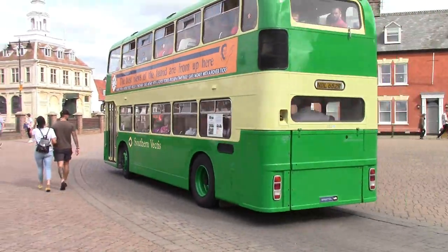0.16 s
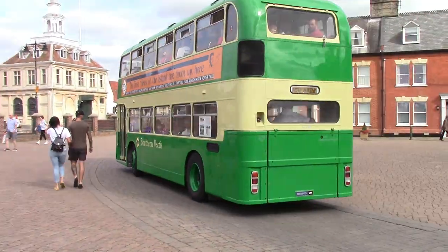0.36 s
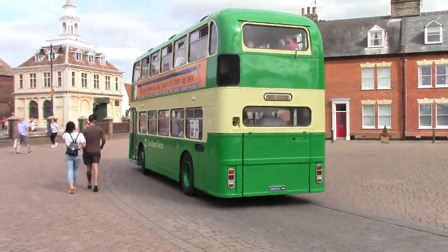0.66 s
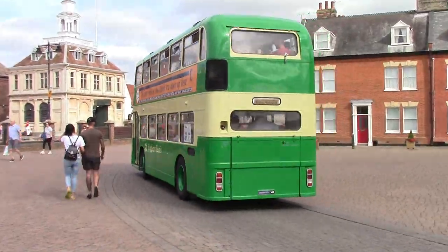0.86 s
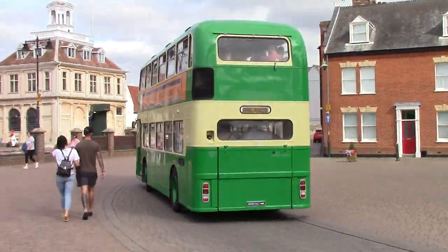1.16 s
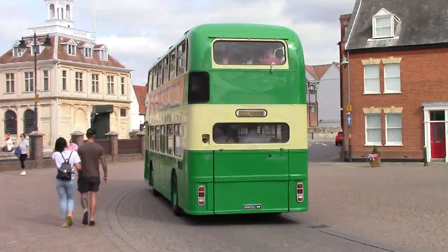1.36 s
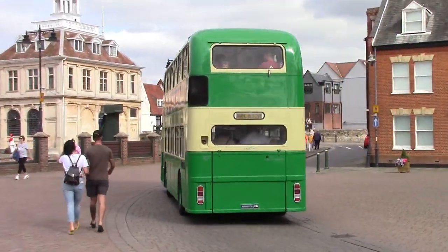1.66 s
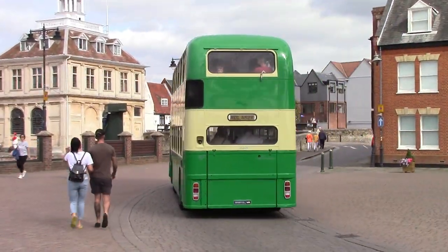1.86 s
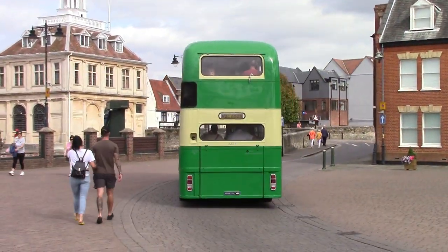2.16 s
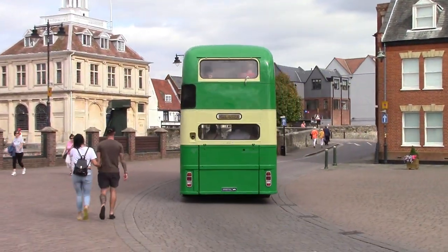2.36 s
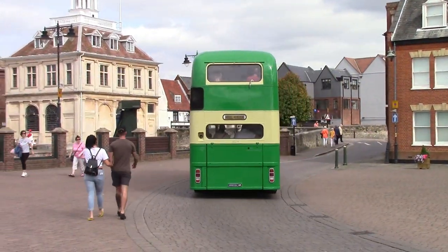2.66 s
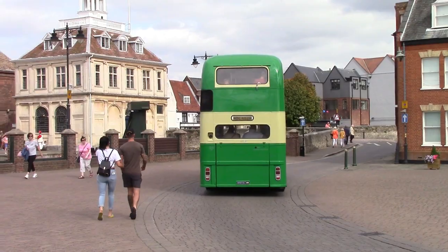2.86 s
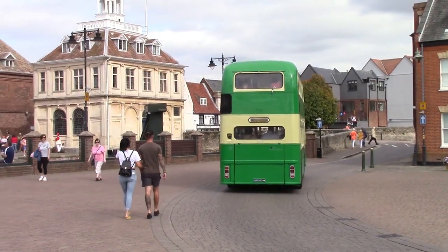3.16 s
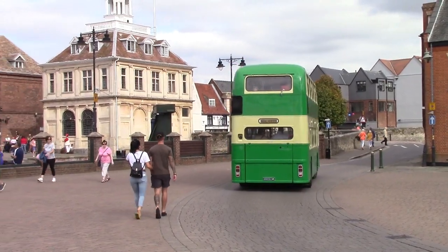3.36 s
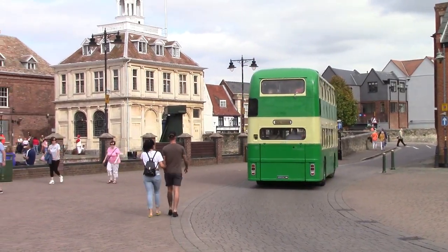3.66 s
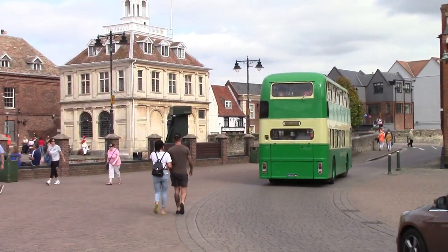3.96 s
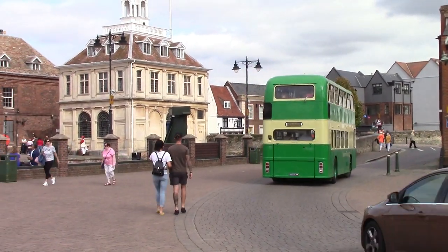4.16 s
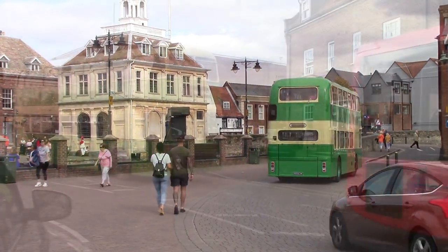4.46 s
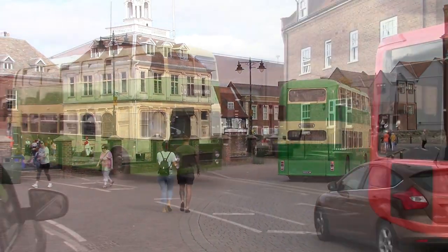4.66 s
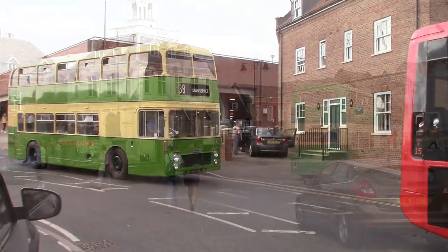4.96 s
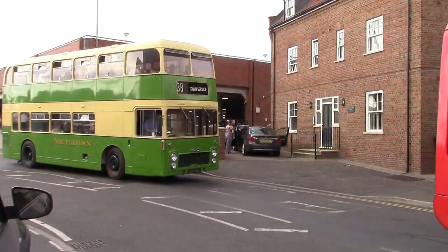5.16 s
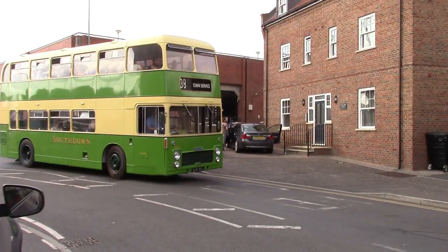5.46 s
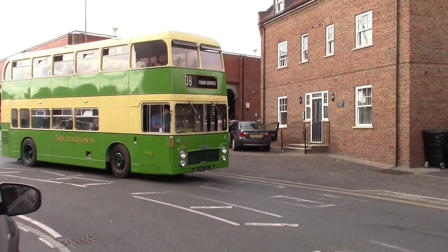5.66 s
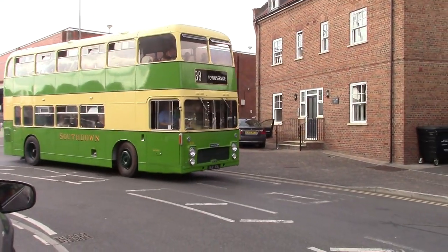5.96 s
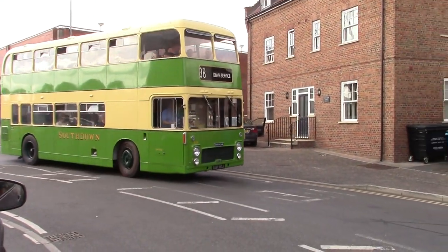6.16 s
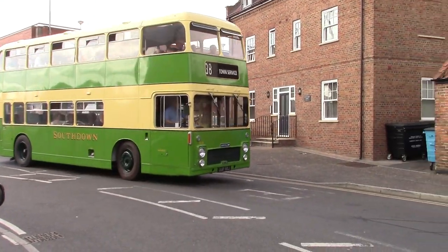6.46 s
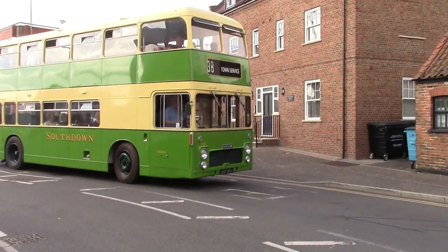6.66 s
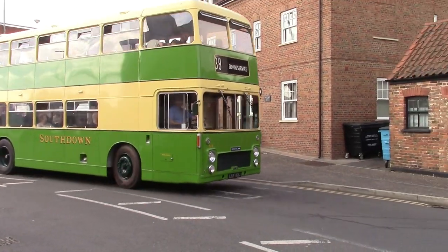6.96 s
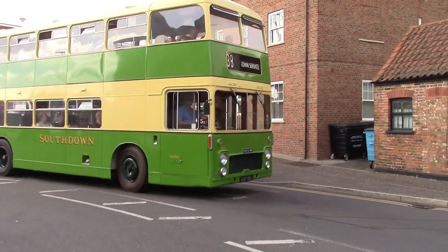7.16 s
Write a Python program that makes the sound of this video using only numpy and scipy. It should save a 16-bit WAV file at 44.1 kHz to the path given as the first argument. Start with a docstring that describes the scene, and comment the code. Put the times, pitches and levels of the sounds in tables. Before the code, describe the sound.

Outdoors in an open paved square, a double-decker's rough diesel roar starts loud and quickly sinks to a thin distant rumble. Small air puffs follow, then one sharp air-brake blast with trailing hiss, and wind snapping in lumps on the microphone. The scene crossfades to a street where two diesels roar close and steadily, with a brief sliding whine, hum and ticking as one bus draws level.

```python
"""A windy town square, then a street. A diesel bus: knocks shaped into a roar that sinks into rumble, puffs and
one brake-air blast of coloured noise, and gusts snapping in lumps on the microphone. The square dissolves into
the street: one diesel runs close by while a second gathers speed and draws level. Uneven firings drive their
roar, block resonances and injector ticks; low multiples of the rates hum."""
import sys
import numpy as np
from scipy import signal
from scipy.fft import rfft, irfft, next_fast_len
from scipy.io import wavfile

SR = 44100
rng = np.random.default_rng(int(sys.argv[2]) if len(sys.argv) > 2 else 0)


def pcm_store(signal):
    """Save signal as 16-bit PCM."""
    levels = np.round(np.clip(np.atleast_2d(signal), -1, 1) * 32767)
    wavfile.write(sys.argv[1], SR, levels.astype(np.int16).T)


def invert_db(x):
    """Field ratio 10**(x/20) for x, a level in decibels (scalar or array-like)."""
    u = np.asarray(x, float) / 20
    return 10 ** u


N = 323253
DISSOLVE_FROM_S, DISSOLVE_S = 4.26, 0.99


def rms_one(x):
    """Scales to rms 1."""
    return x / np.sqrt(np.mean(x ** 2) + 1e-20)


def in_time(rows):
    """Columns of a curve at every sample, and a gate that is open while the curve lasts."""
    s, *columns = np.transpose(rows)
    t = np.arange(N) / SR
    gate = np.interp(t, [s[0] - .02, s[0], s[-1], s[-1] + .02], [0, 1, 1, 0])
    return [np.interp(t, s, column) for column in columns] + [gate]


def colour(x, spectrum):
    """Shapes a signal by a gain curve over log frequency; rms 1."""
    size = next_fast_len(N)
    hz, db = np.transpose(spectrum)
    bin_hz = np.arange(size // 2 + 1) * SR / size
    gain = invert_db(np.interp(np.log(bin_hz + 1), np.log(hz), db))
    return rms_one(irfft(rfft(x, size) * gain, size)[:N])


def hiss(spectrum):
    """Steady coloured noise; rms 1."""
    return colour(rng.standard_normal(N), spectrum)


def drift(corner_hz):
    """Slow chance of spread 1: noise through two equal one-pole low-passes at SR / 40."""
    r = np.exp(-80 * np.pi * corner_hz / SR)
    noise = rng.standard_normal(N // 40 + 2002)
    slow = signal.lfilter([1], [1, -2 * r, r * r], noise)[2000:]
    return np.interp(np.arange(N) / 40, np.arange(len(slow)), rms_one(slow))


def resonance(x, hz, width_hz):
    """Two-pole resonator: rings at one frequency."""
    r = np.exp(-np.pi * width_hz / SR)
    poles = [1, -2 * r * np.cos(2 * np.pi * hz / SR), r * r]
    return signal.lfilter([(1 - r * r) / 2, 0, (r * r - 1) / 2], poles, x)


def swell(start_s, hold_s, db, rise_db_per_s, fall_db_per_s):
    """Envelope that rises to a level, holds and falls, straight in dB."""
    late_s = np.arange(N) / SR - start_s
    rise_db = rise_db_per_s * np.minimum(late_s, 0)
    fall_db = fall_db_per_s * np.maximum(late_s - hold_s, 0)
    return invert_db(db + rise_db - fall_db)


def bursts(rows, rise):
    """Envelope of short bell-shaped swells, rising over a share of the length."""
    t, out = np.arange(N) / SR, np.zeros(N)
    for s, db, length_s in rows:
        near = slice(int((s - .1) * SR), int((s + .15) * SR))
        late = (t[near] - s) / max(length_s, 1e-3)
        out[near] += invert_db(db) * np.exp(-np.where(late < 0, late / rise, late) ** 2)
    return out


# faint bass left under the low cut: (frequency [Hz], density [dB per Hz])
BASS_FLOOR_SPECTRUM = [(12, -58), (20, -32), (101, -23.5), (259, -23), (543, -3), (600, -1), (780, -32),
                       (1320, -120)]


def bass_floor():
    """Steady faint bass noise, independent in the two channels."""
    return invert_db(-66) * np.array([hiss(BASS_FLOOR_SPECTRUM), hiss(BASS_FLOOR_SPECTRUM)])


# low cut over the whole square: (time [s], edge [octaves above 100 Hz])
LOW_CUT_EDGE = [(0, 0), (.22, 1.4), (.3, 1.57), (.5, 2.15), (.8, 2.0), (1.15, 2.5), (1.3, 1.5),
                (1.75, 1.54), (1.9, 2.5), (2.83, 2.5), (3.1, 2.4), (3.4, 3), (3.83, 3), (4.4, 2.5)]


def sliding_low_cut(x):
    """Steep high-pass whose edge slides, stepped in short blocks; a little of the input leaks past."""
    leak_db, block = -42.5, 512
    octaves, _ = in_time(LOW_CUT_EDGE)
    out, state = np.zeros(x.shape), np.zeros((2, len(x), 2))
    for i in range(0, int((DISSOLVE_FROM_S + DISSOLVE_S) * SR), block):
        edge_hz = 100 * 2 ** np.clip(octaves[i], -1, 4)
        sos = signal.butter(4, edge_hz, "high", fs=SR, output="sos")
        out[:, i:i + block], state = signal.sosfilt(sos, x[:, i:i + block], zi=state)
    return out + invert_db(leak_db) * x


# small puffs of air before the low cut: (time [s], level [dB], length [s])
PUFFS = [(1.01, -41, 0.03), (1.13, -44, 0.01), (1.315, -41, .012), (1.54, -40.5, 0.02), (1.77, -47, 0.022),
         (2.025, -48, 0.011), (2.165, -44.5, 0.037), (2.325, -47, 0.025), (2.445, -45, 0.0091),
         (2.53, -47, 0.066), (2.655, -47, 0.034)]


def puff_envelope():
    """Each puff is a short swell of moving air."""
    return bursts(PUFFS, rise=0.72)


# town before the low cut: (time [s], rumble level [dB], treble hiss level [dB])
TOWN_LEVELS = [(0.6, -37, -51), (0.82, -34, -43), (1.36, -32.5, -43), (1.8, -34.5, -43.5),
               (2.55, -34, -48.5), (3.09, -34.5, -42.5), (3.4, -37.5, -38), (3.8, -39, -48),
               (4.3, -38.5, -48), (5.3, -41, -48)]
# town rumble: (frequency [Hz], density [dB per Hz])
TOWN_RUMBLE_SPECTRUM = [(59, -78), (100, -53), (258, -27), (668, -15), (761, -5), (942, -10.5),
                        (1090, -1.5), (1180, -6.5), (1240, 1), (1350, -5), (1840, -1), (3010, -11),
                        (5000, -30), (6500, -67), (11000, -120)]
# town treble and puffs: (frequency [Hz], density [dB per Hz])
TOWN_HISS_SPECTRUM = [(2060, -10.5), (3500, 0), (3700, -4), (5050, -2), (9710, -7), (14400, -28),
                      (15500, -32)]


def town():
    """Mid and side: wavering noise rumble, and a wide hiss that the puffs swell."""
    side_db = -10
    rumble_db, hiss_db, on = in_time(TOWN_LEVELS)
    rumble = on * invert_db(rumble_db + 1.67 * drift(1.73)) * hiss(TOWN_RUMBLE_SPECTRUM)
    treble = on * invert_db(hiss_db + 0.47 * drift(3.1) + 1.5 * drift(24)) + puff_envelope()
    mid = rumble + treble * hiss(TOWN_HISS_SPECTRUM)
    side = invert_db(side_db) * treble * hiss(TOWN_HISS_SPECTRUM)
    return np.array([mid, side])


# blast stages, sounding together: (hold [s], level [dB], fall [dB per s])
BLAST_STAGES = [(.075, -19.5, 142), (.2, -43, 70)]
# after-hiss stages, sounding together: (hold [s], level [dB], fall [dB per s])
AFTER_STAGES = [(.004, -34, 400), (.11, -33, 120), (.5, -38.5, 45)]
# blast: (frequency [Hz], density [dB per Hz])
BLAST_SPECTRUM = [(290, -58), (500, -33), (716, -11), (827, -17), (1090, -5), (1370, -8), (1930, 0.5),
                  (3330, -6.5), (4010, -10.5), (9780, -6), (15500, -27)]
# after-hiss: (frequency [Hz], density [dB per Hz])
AFTER_SPECTRUM = [(2350, -44), (4000, -3), (4190, -24), (4710, -12), (7500, 2), (9300, -2), (15500, -20)]
# blast off the walls, in the side: (frequency [Hz], density [dB per Hz])
AIR_SIDE_SPECTRUM = [(1000, -50), (3000, -24), (5000, -6), (8000, -1), (12000, -5), (15500, -14)]


def venting(stages):
    """Envelope of air from the opening valve: stages that start together and die at their own rates."""
    valve_s, rise_db_per_s = 3.05, 3000
    return sum(swell(valve_s, hold_s, db, rise_db_per_s, fall) for hold_s, db, fall in stages)


def brake_air():
    """Mid and side: turbulent noise vents in a blast and a longer, wider after-hiss."""
    blast_side_db, after_side_db = -23, -4.5
    blast, after = venting(BLAST_STAGES), venting(AFTER_STAGES)
    mid = blast * hiss(BLAST_SPECTRUM) + after * hiss(AFTER_SPECTRUM)
    side = (invert_db(blast_side_db) * blast + invert_db(after_side_db) * after) * hiss(AIR_SIDE_SPECTRUM)
    return np.array([mid, side])


# gusts on the microphone before the low cut: (time [s], hold [s], level [dB])
GUSTS = [(1.257, .04, -40), (1.34, 0.15, -28), (1.58, 0.12, -39), (2.857, .12, -37.5), (3.067, .13, -42),
         (3.26, .19, -29), (3.472, .13, -26.5), (3.62, 0.12, -26), (3.765, .068, -30), (4.027, 0.038, -30),
         (4.093, 0.062, -38.5)]
# hardest buffets before the low cut: (time [s], level [dB], length [s])
BUFFETS = [(1.27, -25, .004), (1.335, -23, .005), (1.357, -28, 0.0045), (1.368, -20, 0.0051),
           (1.381, -20, 0.0032), (1.417, -18, 0.0046), (1.46, -28, .006), (1.483, -21, .003),
           (1.72, -23, .004), (2.915, -26, 0.0044), (2.943, -27, 0.0031), (3.443, -23, .003),
           (3.474, -24, .0015), (3.495, -17.5, 0.0035), (3.539, -21, .004), (3.659, -20, 0.011),
           (3.682, -22, .007), (3.701, -9, 0.0018), (3.709, -19, .006), (3.73, -8, 0.0018),
           (3.776, -20, 0.0056), (3.786, -16, 0.0034), (3.8, -11.5, .002), (3.809, -22, 0.0085),
           (4.038, -19, 0.0042)]
# snaps: (frequency [Hz], density [dB per Hz])
GUST_SPECTRUM = [(100, -5.5), (300, -5), (600, -11), (1200, -14.5), (2500, -22), (4000, -38.5), (8000, -64),
                 (15000, -75)]


def gusts():
    """Mid and side: eddies snap at the ports, a few thousand a second, in lumps."""
    lumpy_db, spread_db, snaps_per_s, side_db = 2.6, 1.6, 2500, -12
    blowing = sum(swell(s, hold_s, db, rise_db_per_s=500, fall_db_per_s=600) for s, hold_s, db in GUSTS)
    lumps = blowing * rms_one(invert_db(lumpy_db * drift(60))) + bursts(BUFFETS, rise=.35)
    happens = rng.random((2, N)) < snaps_per_s / SR
    strength = invert_db(spread_db * np.minimum(rng.exponential(1, (2, N)), 4))
    snaps = happens * strength * rng.choice([-1, 1], (2, N))
    mid, side = lumps * np.array([colour(s, GUST_SPECTRUM) for s in snaps])
    # long waves reach both ports alike
    side = signal.sosfilt(signal.butter(3, 800, "high", fs=SR, output="sos"), side)
    return np.array([mid, invert_db(side_db) * side])


def firings(per_s, uneven_db):
    """One click per firing, of random strength."""
    clicks = np.diff(np.floor(np.cumsum(per_s) / SR), prepend=0)
    return clicks * invert_db(uneven_db * rng.standard_normal(N))


def dying(clicks, decay_s):
    """Envelope that jumps at each click and dies; rms 1."""
    return rms_one(signal.lfilter([1], [1, -np.exp(-1 / (decay_s * SR))], clicks + 1e-18))


def combustion(clicks, decay_s, gate, alike_db):
    """Firings swell fresh noise and repeat one same knock: faint lines on every multiple of the rate."""
    knock = rng.standard_normal(4096) * np.exp(-np.arange(4096) / (2 * decay_s * SR))
    fresh = (1 + gate * dying(clicks, decay_s)) * rng.standard_normal(N)
    alike = rms_one(signal.fftconvolve(clicks, knock)[:N])
    return fresh + invert_db(alike_db) * alike


# engine block resonances: (frequency [Hz], width [Hz], level [dB])
BLOCK_RESONANCES = [(473, 150, -34.5), (816, 38, -5.5), (1176, 120, -8), (1330, 35, -3.5),
                    (2300, 600, -8.5)]


def engine_block(knocks, waver_db):
    """Knocks ring the casting; each resonance swells on its own; rms 1."""
    ringing = 0
    for hz, width_hz, db in BLOCK_RESONANCES:
        level = invert_db(db + waver_db * drift(4.8))
        ringing = ringing + level * rms_one(resonance(knocks, hz, width_hz))
    return rms_one(ringing)


# fading bus before the low cut: (time [s], roar level [dB])
FADING_ROAR_LEVEL = [(0, -10.5), (.25, -17.5), (.31, -21.5), (.5, -20.5), (.72, -27), (.82, -35.5),
                     (1.0, -29.5), (1.4, -31.5), (1.75, -35), (1.9, -58)]
# fading bus before the low cut: (time [s], treble level [dB])
FADING_TREBLE_LEVEL = [(0.0, -24.5), (0.228, -27.5), (0.264, -33.5), (0.564, -35), (0.85, -46)]
# fading bus roar: (frequency [Hz], density [dB per Hz])
FADING_ROAR_SPECTRUM = [(35, -70), (60, -40), (86, -15), (209, -4.5), (430, -5), (554, -0.5), (606, -3.5),
                        (824, -0.5), (902, -4), (1040, -0.5), (2000, -9), (2180, -14), (4500, -44),
                        (5850, -57), (9900, -120)]
# fading bus treble: (frequency [Hz], density [dB per Hz])
FADING_TREBLE_SPECTRUM = [(2060, -26), (3500, 2), (4380, -9.5), (5760, 1), (8360, -2.5), (13000, -12),
                          (15500, -22)]


def fading_bus():
    """Firings knock through the block; the roar and treble sink."""
    firing_per_s, block_db = 42.0, -8.0
    roar_db, on = in_time(FADING_ROAR_LEVEL)
    treble_db, treble_on = in_time(FADING_TREBLE_LEVEL)
    fired = firings(np.full(N, firing_per_s), uneven_db=3.5)
    knocks = combustion(fired, decay_s=0.009, gate=0.13, alike_db=-5.5)
    roar = colour(knocks, FADING_ROAR_SPECTRUM) + invert_db(block_db) * engine_block(knocks, waver_db=4.5)
    treble = treble_on * invert_db(treble_db) * hiss(FADING_TREBLE_SPECTRUM)
    return on * invert_db(roar_db + 0.17 * drift(7.7)) * roar + treble


# patchy band in the street hiss: (time [s], centre [Hz], level [dB])
HISS_BAND = [(4.2, 4860, -36), (5.3, 5010, -33), (5.9, 5120, -28), (6.4, 4850, -30.5), (7.33, 4530, -42)]


def hiss_band():
    """Noise several hundred Hz wide riding on a drifting centre, swelling in patches."""
    hz, db, _ = in_time(HISS_BAND)
    turn = 2 * np.pi * np.cumsum(hz) / SR
    low_pass = signal.butter(2, 450, fs=SR, output="sos")
    a, b = signal.sosfilt(low_pass, rng.standard_normal((2, N)))
    return invert_db(db + 3.4 * drift(2.8)) * rms_one(a * np.cos(turn) + b * np.sin(turn))


# breathy whine sliding down as one bus passes: (time [s], pitch [Hz], level [dB], octave level [dB])
WHINE = [(4.7, 1330, -43, -58), (5.0, 1270, -33, -45), (5.2, 1199, -22.5, -22), (5.35, 1160, -19, -30),
         (5.55, 1132, -33, -34), (5.8, 1094, -23, -38), (5.95, 1093, -54.5, -60)]


def whine():
    """Narrow noise bands riding on the sliding pitch and its octave."""
    hz, db, octave_db, on = in_time(WHINE)
    turn = 2 * np.pi * np.cumsum(hz) / SR

    def band(k):
        return drift(35) * np.cos(k * turn) + drift(37.0) * np.sin(k * turn)

    return on * (invert_db(db) * band(1) + invert_db(octave_db) * band(2))


def order(per_s, multiple, waver_db):
    """Near-sine on a multiple of the firing rate; level wavers, and phase with the crank's uneven turning."""
    level = np.sqrt(2) * invert_db(waver_db * (drift(6.2) + drift(22)))
    turn = 2 * np.pi * multiple * np.cumsum(per_s) / SR
    return level * np.sin(turn + 0.12 * multiple * drift(10.5) + 6 * rng.random())


def tones(per_s, multiples, rows, waver_db):
    """Orders of one engine, each at rest level plus a spell in which it stands out."""
    hum = 0
    for multiple, (rest_db, s, hold_s, db) in zip(multiples, rows):
        spell = swell(s, hold_s, db, rise_db_per_s=60, fall_db_per_s=38)
        hum = hum + (invert_db(rest_db) + spell) * order(per_s, multiple, waver_db)
    return hum


# orders that hum in the near diesel: [multiples of the firing rate]
NEAR_ORDERS = (1, 2, 7, 8, 9, 10)
# one row an order: (resting level [dB], spell start [s], hold [s], level added in the spell [dB])
NEAR_TONES = [(-65, 6.3, 0.44, -62), (-50.5, 6.68, 0.49, -46.5), (-41.5, 5.86, 0.87, -22),
              (-40, 5.55, 2, -30), (-39, 6.15, .55, -27), (-39, 4.7, 0.27, -28)]


def near_hum(per_s):
    """The near diesel's orders follow its firing rate."""
    return tones(per_s, NEAR_ORDERS, NEAR_TONES, waver_db=1.7)


# orders that hum in the speeding diesel: [multiples of the firing rate]
SPEEDING_ORDERS = (2, 4, 5, 9)
# one row an order: (resting level [dB], spell start [s], hold [s], level added in the spell [dB])
SPEEDING_TONES = [(-66, 6.9, 0.25, -57), (-50.5, 6.0, .75, -41), (-45.5, 6.5, 0.38, -41),
                  (-46, 6.8, 0.52, -24)]


def speeding_hum(per_s):
    """The speeding diesel's orders follow its firing rate."""
    return tones(per_s, SPEEDING_ORDERS, SPEEDING_TONES, waver_db=1.4)


def injector_ticks(fired, nearness_db):
    """Each firing sets off a noise tick, rung in two treble bands; louder as the diesel nears."""
    tick = dying(fired, decay_s=.0038) * rng.standard_normal(N)

    def ring(hz, width_hz=3000):  # width of each of two passes
        return rms_one(resonance(resonance(tick, hz, width_hz), hz, width_hz))

    return invert_db(-35 + nearness_db) * ring(8600) + invert_db(-47 + .3 * nearness_db) * ring(11500)


# street treble: (frequency [Hz], density [dB per Hz])
STREET_TREBLE_SPECTRUM = [(1880, -25), (3200, -0.5), (4310, -4), (5250, -2), (6310, -4.5), (8780, -9.5),
                          (12500, -22), (15500, -26)]


def street_treble(near_fired):
    """Coloured noise that pulses with the near diesel's firings; rms 1."""
    pulse = 1 + 0.39 * dying(near_fired, decay_s=0.008)
    return colour(pulse * rng.standard_normal(N), STREET_TREBLE_SPECTRUM)


# street roar: (frequency [Hz], density [dB per Hz])
STREET_ROAR_SPECTRUM = [(24, -69), (40, -90), (92, -91), (129, -21.5), (290, -11), (408, -3.5), (452, -4),
                        (500, -5.5), (542, -4), (719, -2.5), (1010, -1), (1580, -5), (2470, -4),
                        (3210, -15.5), (5000, -24), (6500, -79), (11000, -120)]


def street_roar(near_fired, speeding_fired, nearness_db):
    """Both diesels' knocks, coloured, and ringing the block more strongly as the second one nears."""
    knocks = combustion(near_fired, decay_s=0.0057, gate=0.15, alike_db=-5)
    knocks += invert_db(-4) * combustion(speeding_fired, decay_s=0.012, gate=0.3, alike_db=-5.5)
    block = invert_db(-9 + 0.23 * nearness_db) * engine_block(knocks, waver_db=5.0)
    return colour(knocks, STREET_ROAR_SPECTRUM) + block


# street: (time [s], roar level [dB], treble level [dB])
STREET_LEVELS = [(4.2, -13.5, -21), (5.4, -13.5, -24.5), (5.82, -13.5, -24), (6.61, -13.5, -26.5),
                 (7.33, -14.5, -29.5)]
# near diesel: (time [s], firing rate [firings per s])
NEAR_FIRING = [(4.3, 59.5), (4.6, 63.1), (4.8, 65.3), (5.0, 65.1), (5.25, 61.8), (5.5, 61), (5.8, 63.3),
               (6.0, 63.8), (6.4, 66.5), (6.8, 68), (7.33, 67)]
# diesel gathering speed: (time [s], firing rate [firings per s])
SPEEDING_FIRING = [(4.5, 43.1), (5.0, 42.2), (5.8, 40), (6.0, 40.7), (6.4, 44.8), (6.8, 48.9), (7.0, 50.3),
                   (7.33, 52)]
# the diesel gathering speed draws level: (time [s], nearness [dB])
NEARNESS = [(4.5, -1), (6.2, -13), (6.7, -8), (6.9, 0.5), (7.15, -0.5), (7.33, -4)]


def street():
    """Two diesels: their firings drive roar, treble and ticks; multiples of each rate stand out as tones."""
    roar_db, treble_db, _ = in_time(STREET_LEVELS)
    near_per_s, _ = in_time(NEAR_FIRING)
    speeding_per_s, _ = in_time(SPEEDING_FIRING)
    nearness_db, _ = in_time(NEARNESS)
    near_fired = firings(near_per_s, uneven_db=3.0)
    speeding_fired = firings(speeding_per_s, uneven_db=3.5)
    roar = invert_db(roar_db + 0.27 * drift(10)) * street_roar(near_fired, speeding_fired, nearness_db)
    treble = invert_db(treble_db) * street_treble(near_fired)
    hum = near_hum(near_per_s) + speeding_hum(speeding_per_s)
    return roar + treble + hum + injector_ticks(speeding_fired, nearness_db) + whine() + hiss_band()


def scene():
    """The square under its low cut dissolves evenly into the street."""
    share = np.clip((np.arange(N) / SR - DISSOLVE_FROM_S) / DISSOLVE_S, 0, 1)
    bus = fading_bus() * [[1], [0]]  # mid only
    mid, side = (1 - share) * sliding_low_cut(town() + brake_air() + gusts() + bus)
    return mid + bass_floor() + share * street() + side * [[1], [-1]]


def band_limit(x):
    """A steep low-pass at the top of the band."""
    return signal.sosfilt(signal.butter(12, 15630, fs=SR, output="sos"), x)


def record(dry):
    """Rounds peaks smoothly towards a ceiling."""
    ceiling = .93
    mix = dry / (1 + np.abs(dry / ceiling) ** 5) ** (1 / 5)
    return band_limit(mix)


dry = scene()
out = record(dry)
pcm_store(out)
```